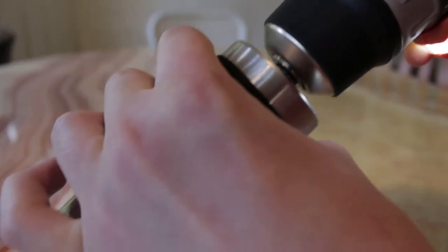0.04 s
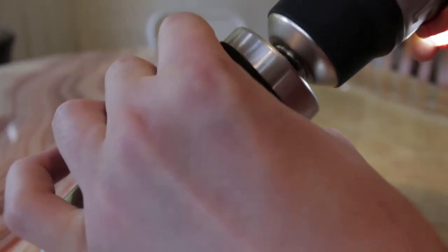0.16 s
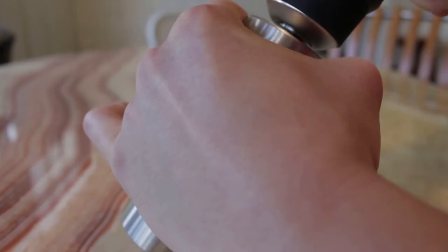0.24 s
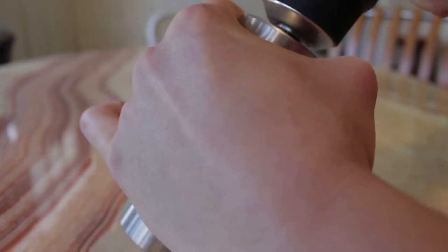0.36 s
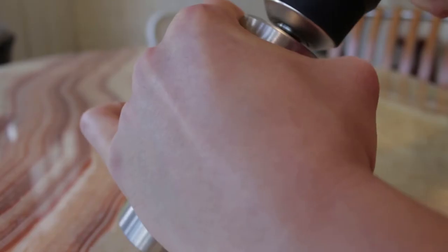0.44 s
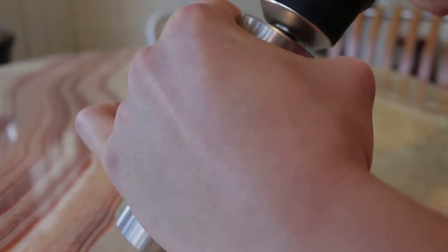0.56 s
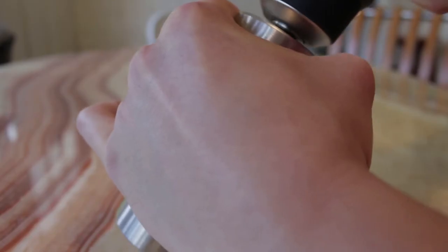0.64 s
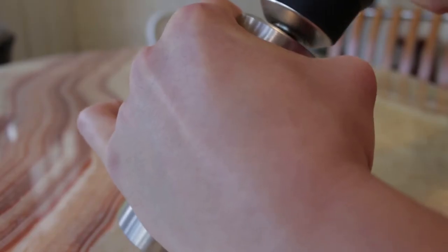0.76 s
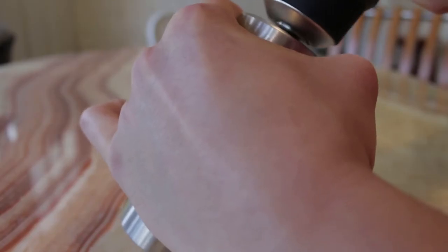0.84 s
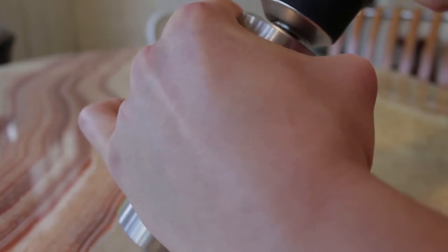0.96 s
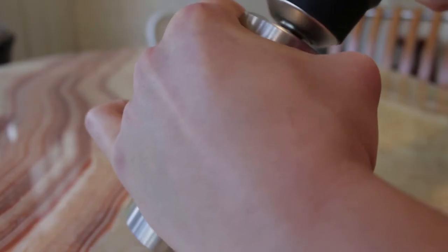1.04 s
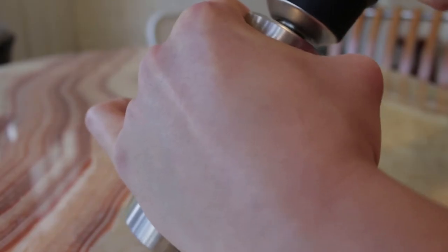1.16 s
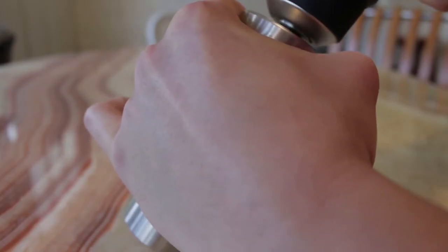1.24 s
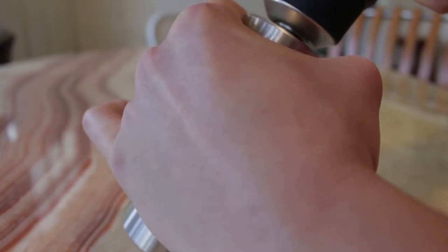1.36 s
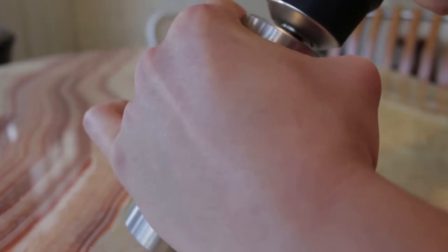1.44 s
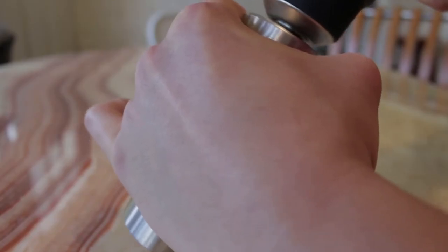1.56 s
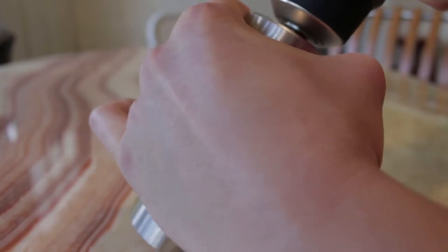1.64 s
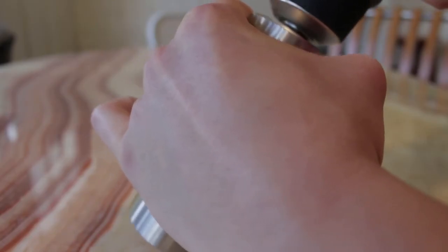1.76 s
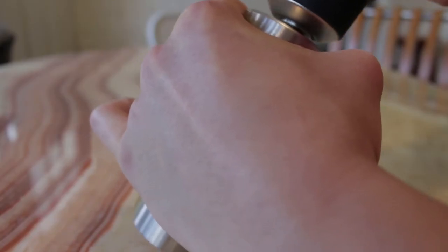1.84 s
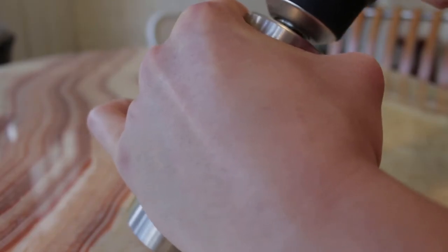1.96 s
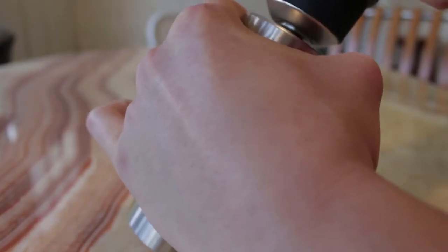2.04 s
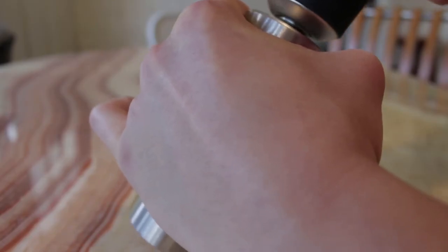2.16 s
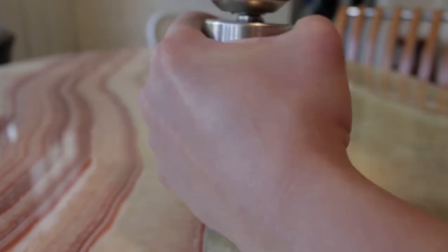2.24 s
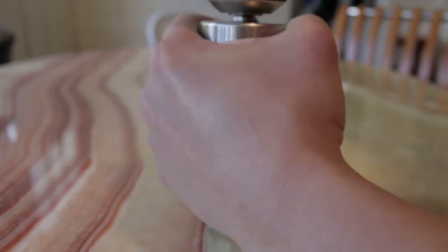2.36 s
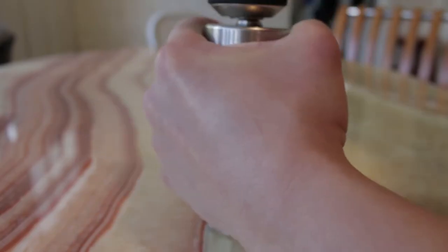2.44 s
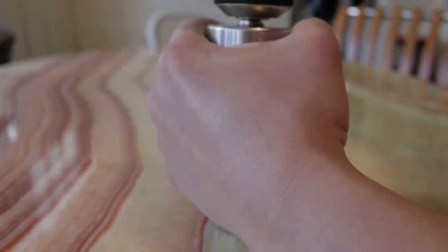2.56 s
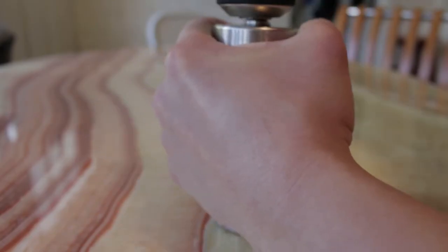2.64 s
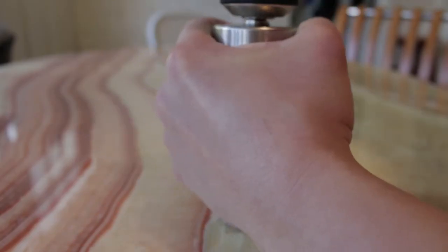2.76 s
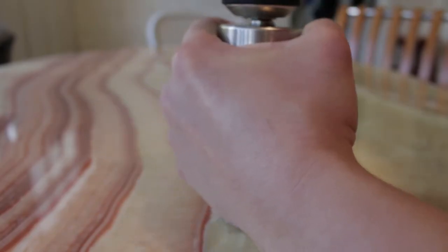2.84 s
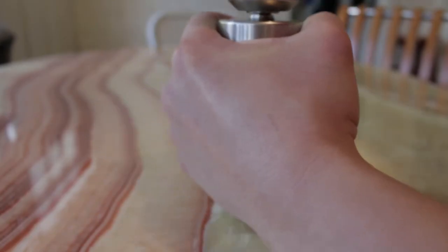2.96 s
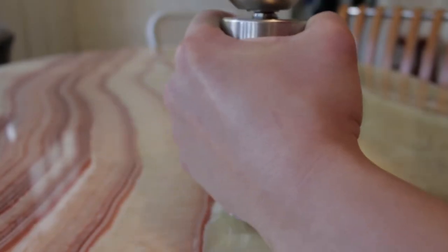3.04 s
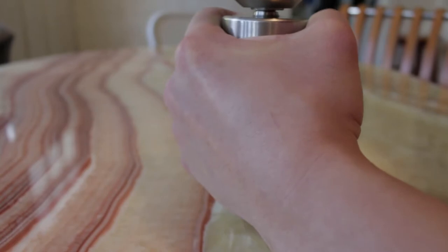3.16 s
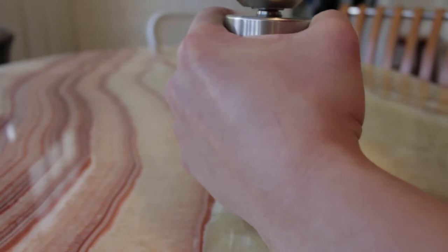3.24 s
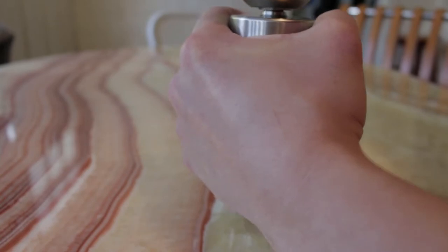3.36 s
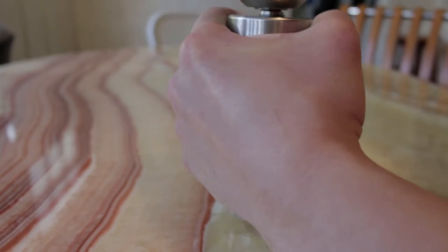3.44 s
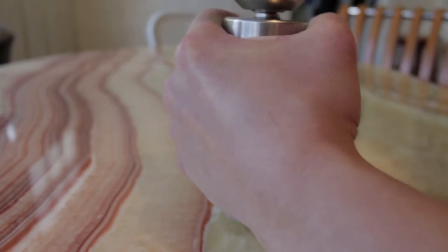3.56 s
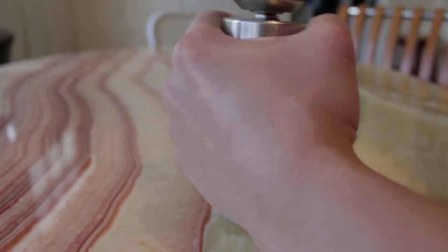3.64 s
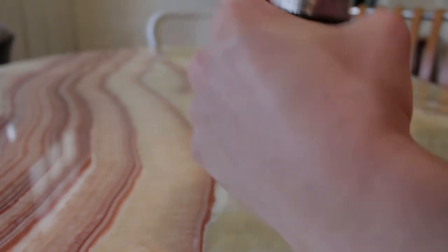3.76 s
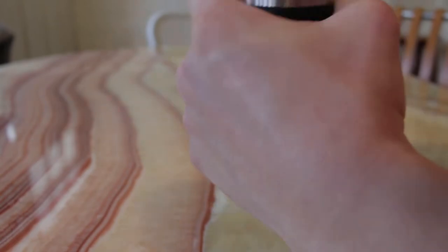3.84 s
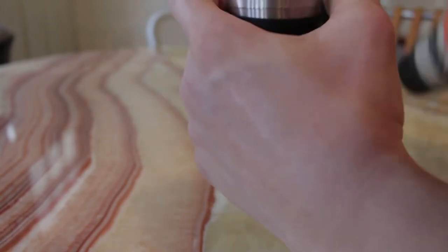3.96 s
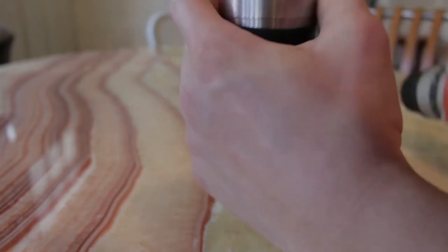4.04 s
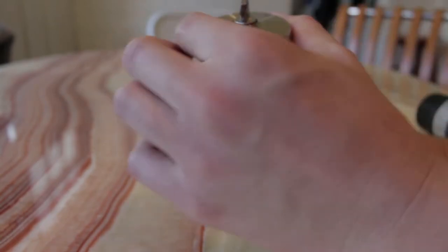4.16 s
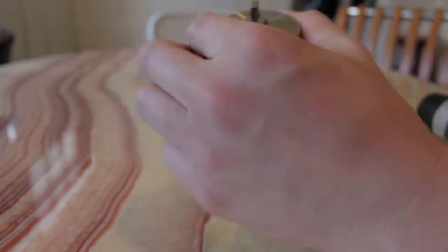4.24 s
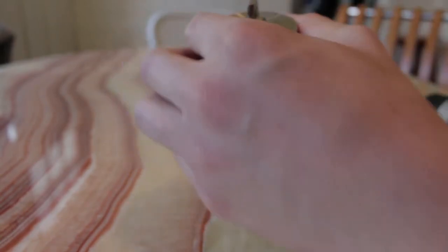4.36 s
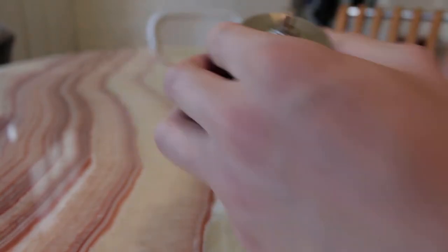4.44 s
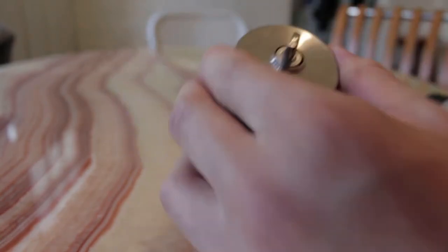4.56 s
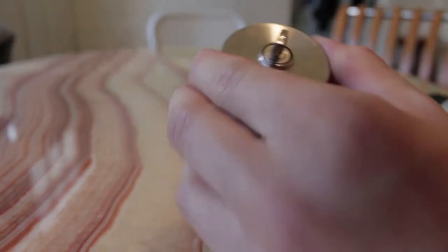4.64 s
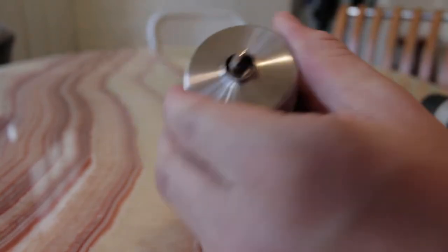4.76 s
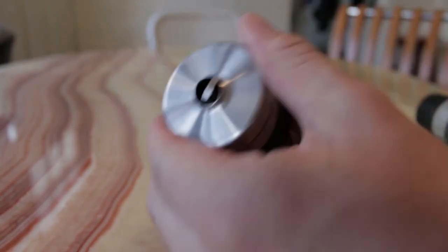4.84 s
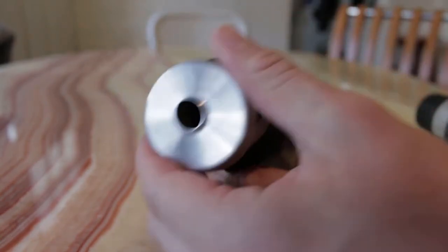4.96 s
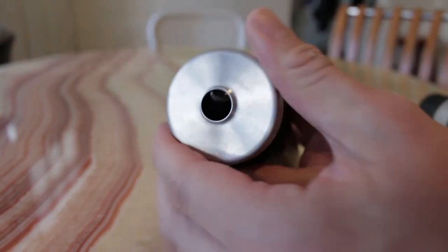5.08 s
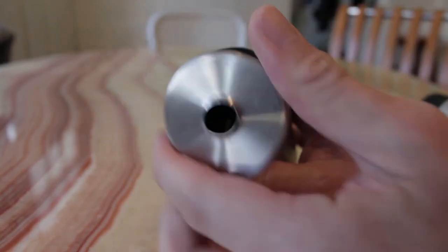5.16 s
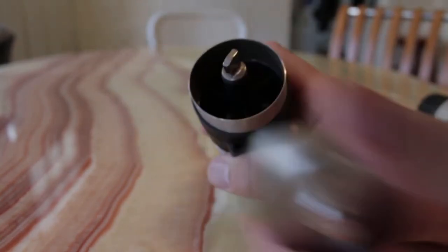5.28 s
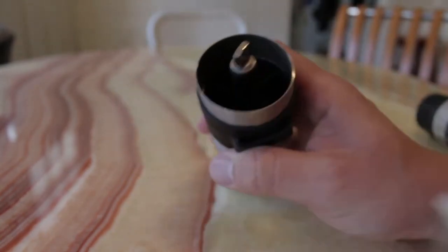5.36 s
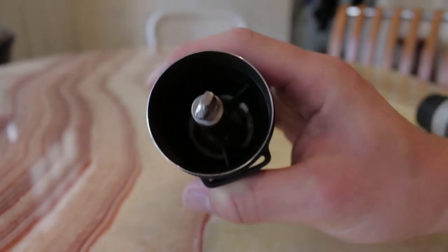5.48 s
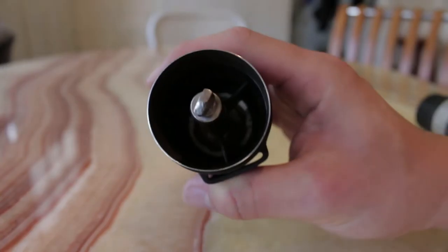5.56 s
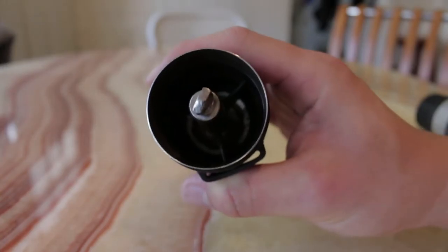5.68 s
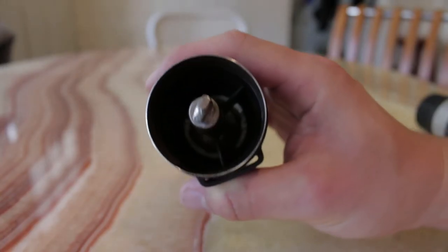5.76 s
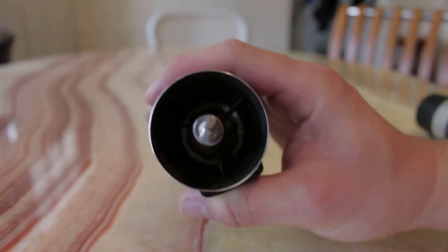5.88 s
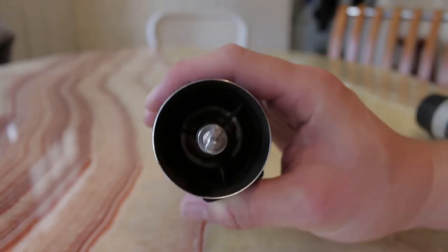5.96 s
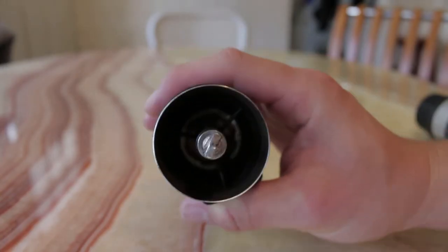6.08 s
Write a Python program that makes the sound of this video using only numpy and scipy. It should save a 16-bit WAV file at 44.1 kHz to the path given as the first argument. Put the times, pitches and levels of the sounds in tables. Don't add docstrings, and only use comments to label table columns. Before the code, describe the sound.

A loud motor whirr with rattling grinder teeth runs slightly right of a near stereo microphone, briefly rising, then jumping by hard cuts into two longer wavering spells. The drill halts, leaving a short steel ring. Fingernail ticks, a heavy table knock, dry scrapes and soft bumps lead to sharp lid clinks, a scraping slide and low air puffs, before the quiet room hush is left alone.

```python
import sys
import numpy as np
from scipy import signal
from scipy.fft import rfft, irfft, next_fast_len
from scipy.io import wavfile
from scipy.ndimage import uniform_filter1d

SR = 44100
rng = np.random.default_rng(int(sys.argv[2]) if len(sys.argv) > 2 else 0)


def file_out(sig):
    cols = np.atleast_2d(sig).T
    lim = np.clip(cols, -1, 1)
    pcm = np.round(lim * 32767).astype(np.int16)
    wavfile.write(sys.argv[1], SR, pcm)


def ratio(d):
    e = np.asarray(d, float) / 20
    return 10 ** e


N = 269444
T = np.arange(N) / SR

SPELL_EDGES = [
    0,
    .229,
    2.229,
    3.671,
]
# [f/Hz, density/dB per Hz]
RATTLE_COLOUR = [
    [(35, -90), (60, -64), (279, -29), (329, 10.5), (378, -33), (466, -17.5), (725, -18), (959, -16),
     (1050, -12.5), (2440, -18), (3450, -13.5), (4570, -27), (15700, -29)],
    [(35, -67), (60, -52), (136, -44), (279, -33), (321, -11), (361, -26.5), (709, -9), (874, -10),
     (1050, -14.5), (2610, -13), (3070, -16.5), (3450, -8.5), (4260, -18), (6180, -16.5), (15700, -26)],
    [(35, -74), (60, -53), (149, -46), (232, -30), (321, -3), (378, -28), (588, -13), (725, -12),
     (874, -11), (1050, -12.5), (2380, -14), (2610, -10.5), (3070, -14.5), (6790, -16), (15700, -24.5)],
]
# [f/Hz, level/dB]
MESH_LINES = [
    [(979.8, -34.5), (3429, -31.5), (4059, -38), (4893, -50), (5259, -44), (9868, -53), (13819, -63),
     (14147, -60)],
    [(969.0, -38), (1292, -57), (1620, -52), (1943, -55), (2568, -54), (2912, -42), (3402, -38.5),
     (3725, -39.5), (4538, -67), (5259, -52), (6153, -44.5), (6912, -43.5), (10686, -46), (11596, -41),
     (14578, -49)],
    [(963.6, -37), (2541, -40), (2885, -42), (3386, -36), (3639, -41.5), (4506, -65.5), (5157, -61.5),
     (5507, -41), (5776, -44), (6121, -51), (6767, -45), (8355, -63), (8753, -60), (10632, -40),
     (11929, -58)],
]
# [rattle level/dB, fan hiss over rattle/dB, extra left minus right/dB]
RATTLE_MIX = [
    (-26.5, 5.5, -2.3),
    (-25.5, -1.5, -1),
    (-25, 0, 0.4),
]
# [t/s, rotor f/Hz, rotor level/dB]
ROTOR_COURSE = [
    [(0, 322.8, -30), (.146, 326.4, -28.5), (.222, 328, -25.5)],
    [(.24, 317, -34.5), (.35, 324.7, -30.5), (1.03, 322.4, -33), (1.12, 317, -46), (1.22, 322.2, -30.5),
     (1.67, 320.3, -34), (2.0, 325.3, -30), (2.09, 322, -35.5), (2.22, 320.6, -31)],
    [(2.24, 315.7, -35), (2.406, 323.2, -32.5), (2.55, 319.6, -37.5), (3.1, 323.2, -32),
     (3.48, 319.4, -36.5), (3.66, 322, -32)],
]
# [t/s, whine f/Hz, whine level/dB]
GEAR_COURSE = [(0, 905, -31), (.225, 915, -51), (.235, 862, -32.5), (.34, 902, -24.5), (.5, 864, -30),
               (.9, 883, -28.5), (1.08, 848.3, -32), (1.28, 885, -27.5), (1.42, 859.5, -27.5),
               (1.55, 879.7, -28), (2.03, 885, -30), (2.45, 890, -25), (2.58, 870, -24.5), (2.74, 899, -26),
               (2.88, 872, -27.5), (3.1, 908, -29.5), (3.47, 860.5, -29.5), (3.58, 883, -24.5)]
# [start t/s, length/s, level/dB]
CHATTER_BURSTS = [
    (2.423, 0.09, -33),
    (2.55, 0.15, -36),
    (2.75, .14, -40.5),
]
# [f/Hz, density/dB per Hz]
HUSH_COLOUR = [(12, -48), (20, -31), (49, -8), (149, -16.5), (186, -10), (268, -10), (364, -4.5),
               (442, -18.5), (537, -9.5), (584, -13), (15700, -44)]
# [f/Hz, left minus right/dB]
STEREO_LEAN = [(60, 0.0), (110, 0.0), (200, 0.0), (380, 0.0), (700, -0.5), (1290, -1.0), (2380, -2.0),
               (4400, -4.5), (8120, -4.5), (15000, -3.5)]
# [start t/s, end t/s, wood level at start/dB, wood level at end/dB, tube level/dB]
SLIDE_STROKES = [
    (3.95, 4.06, -54, -58, -78),
    (4.068, 4.356, -42, -49.5, -47),
    (4.48, 4.628, -56, -41.5, -56.5),
    (4.701, 4.812, -36, -53, -47.5),
    (4.906, 5.153, -43, -48, -44),
    (5.166, 5.229, -46, -42, -74),
    (5.227, 5.43, -42.5, -41.5, -44),
]
# [f/Hz, width/Hz, level/dB]
TUBE_MODES = [(2460, 300, 2.5), (3050, 100, -2.5), (3965, 290, 0.5), (4580, 130, -7), (5060, 430, -9.5)]
# [start t/s, end t/s, f/Hz, level/dB]
FINGER_SQUEAK = (4.075, 4.245, 13800, -56)
# [t/s, level/dB, half length/s]
AIR_PUFFS = [
    (4.077, -56, 0.065),
    (4.203, -54, 0.035),
    (4.656, -54, 0.094),
    (5.199, -38.5, 0.038),
    (5.28, -49, .06),
    (5.377, -47, .04),
    (5.5, -60, 0.13),
    (5.82, -62, 0.18),
]
# [t/s, level/dB]
NAIL_TICKS = [
    (3.832, -46),
    (3.893, -43.5),
    (4.0685, -44),
    (4.684, -32.5),
]
# [t/s, peak level/dB, contact/ms, drag over peak/dB, drag/s]
TABLE_BLOWS = [
    (4.3640, 1.5, 0.31, -29, 0.07),
    (4.6227, -26, 0.35, 0.5, 0.052),
    (4.8194, -25.5, 0.67, -13, 0.016),
    (4.864, -27, 2.7, -22, 0.027),
    (4.876, -29.5, 2.2, -23, 0.033),
    (5.2205, -32, .4, -5.5, 0.0085),
]
# [f/Hz, level/dB, t60/s]
TABLE_MODES = [(281, 5.5, 0.23), (442, 14.5, 0.01), (600, 1, 0.07), (670, 4, 0.032), (857, 12, 0.032),
               (1060, -6, 0.014), (1434, 2.5, .04), (1730, 3.5, 0.044), (2070, -5, 0.017),
               (2700, -19, 0.026), (4000, -18, .01)]
# [f/Hz, density/dB per Hz]
DRAG_COLOUR = [(290, -19), (500, -17), (628, -23), (976, -7.5), (1280, -6), (1850, -14), (2200, -23),
               (2840, -18), (3230, -27.5), (7470, -34), (15000, -49)]
# [t/s, peak level/dB, brightness/dB, lifted 0-1]
LID_CLINKS = [(4.781, -29, -4, 0.1), (4.8175, -18, 1, 0), (4.8193, -6.5, -4, 0.1),
              (4.8217, -11.5, 10, 0.07), (4.859, -35, 7, 0.1), (4.866, -30, 5, 0.1), (4.879, -34, 3, 0.2),
              (4.8868, -21, 5, 0.8), (4.8885, -13, 4, 0.9), (4.893, -17.5, 8, 0.93), (4.905, -28, 6, 1),
              (4.924, -39, 4, 1)]
# [f/Hz, level/dB, t60/s]
LID_MODES = [(444, -11.5, 0.035), (1720, -14, 0.028), (3040, -15, 0.11), (3110, 3.5, 0.013),
             (3270, -4.5, 0.039), (3450, -3, 0.0097), (4900, -16, 0.11), (5130, -8.5, 0.02),
             (7870, -32, 0.17), (7720, -13.5, 0.013), (10200, -28.5, 0.066), (11600, -23, 0.018),
             (13800, -29, 0.027)]
FLAT = [(1, 0), (2, 0)]

LAST_CHANGE_S = 5.430
STOP_S = 0.0053
CHUCK_HZ = 9.2
SWAY_RATE_HZ, SWAY_PITCH, SWAY_DB = 14, 0.00799, -0.64
CHATTER_REST_DB, CHATTER_EDGE_DB_PER_S = -61.5, 600
BASS_T60_S, TREBLE_T60_S, LEFT_LAG_S = 0.47, 0.55, .00004
RING_OUT_DB, RING_OUT_T60_S = -45, .33
TUBE_FOLLOWS, SKIN_DB = 0.65, -6
SQUEAK_RATE_HZ, SQUEAK_SWING_HZ, SQUEAK_SWING_DB = 10.4, 230, 4
LIFT_DROP, RIM_HZ = 0.083, 4000


def unit(x):
    return x / np.sqrt(np.mean(x ** 2))


def shape(x, points, lo_hz=0, hi_hz=1e6):
    length = x.shape[-1]
    size = next_fast_len(length, True)
    f = np.arange(size // 2 + 1) * SR / size + 1e-3
    hz, db = np.transpose(points)
    curve = ratio(np.interp(np.log(f), np.log(np.maximum(hz, 1)), db))
    edges = 1 / np.sqrt((1 + (lo_hz / f) ** 8) * (1 + (f / hi_hz) ** 8))
    return irfft(rfft(x, size) * curve * edges, size)[..., :length]


def band(lo_hz, hi_hz, x=None):
    source = rng.standard_normal(N) if x is None else x
    return unit(shape(source, FLAT, lo_hz, hi_hz))


def walk(rate_hz, size=N):
    k = int(SR / rate_hz)
    return unit(uniform_filter1d(uniform_filter1d(rng.standard_normal(size), k), k))


def columns(rows):
    s, *rest = np.transpose(rows)
    return [np.interp(T, s, column) for column in rest]


def tone(hz):
    return np.sqrt(2) * np.sin(2 * np.pi * (np.cumsum(hz) / SR + rng.random()))


def grit(rate_hz, spread_db):
    hits = rng.random(N) < rate_hz / SR
    force = rng.standard_normal(N)
    return hits * force * ratio(spread_db * np.minimum(rng.exponential(size=N), 3))


def ring(modes, gains_db, rise_s=1e-5):
    t = T[:SR // 2]
    sound = np.zeros(len(t))
    for (hz, db, t60), gain_db in zip(modes, gains_db):
        sound += ratio(db + gain_db) * np.sin(2 * np.pi * hz * t) * 1000. ** (-t / t60)
    return sound * (1 - np.exp(-t / rise_s))


def add(track, s, sound, db):
    i = int(s * SR)
    track[i:i + len(sound)] += ratio(db) * sound / np.abs(sound).max()


def space(x, room_db):
    t = T[:int(.6 * SR)]
    noise = rng.standard_normal((2, len(t))) * (t > .003)
    bass = shape(noise, FLAT, hi_hz=2200)
    treble = noise - bass
    mid, side = bass * 1000. ** (-t / BASS_T60_S) + treble * 1000. ** (-t / TREBLE_T60_S)
    side = shape(side, [(250, -15.5), (1000, -5.0), (4000, 0.5), (12000, -7.0)])
    tails = np.array([mid + side, mid - side]) / np.sqrt(2 * np.sum(mid ** 2))
    left = np.interp(T[:len(x)] - LEFT_LAG_S, T[:len(x)], x)
    room = signal.fftconvolve(x[None], tails, axes=1)[:, :len(x)]
    both = np.array([left, x]) + ratio(room_db) * room
    both /= np.sqrt(1 + ratio(2 * room_db))
    leans = [[(hz, sign * db / 2) for hz, db in STEREO_LEAN] for sign in (1, -1)]
    return np.array([shape(port, lean) for port, lean in zip(both, leans)])


def tooth_rattle(span, chuck, colour, rattle_db, fan_db):
    n = len(chuck)
    teeth = unit(grit(3000, 1.25)[span]) + 1.18 * rng.standard_normal(n)
    teeth = shape(teeth * ratio(0.18 * chuck + 0.98 * np.tanh(walk(25, n))), colour)
    teeth /= np.std(shape(teeth, FLAT, 1260, 3890))
    body_eq = [(200, -1.0), (270, -9), (323, -9.5), (400, 2.0), (750, -6.5), (870, 4), (1050, 1.5)]
    low = shape(teeth, body_eq, hi_hz=3850)
    fan = shape(teeth, FLAT, lo_hz=4540)
    return ratio(rattle_db - 1) * (low + ratio(fan_db) * fan)


def gear_whine(chuck, whine_hz, whine_db):
    n = len(chuck)
    pitch = whine_hz * (1 + 0.0107 * walk(73.3, n) + 0.011 * chuck)
    whine = ratio(whine_db + 1.1 * chuck + 5.2 * np.tanh(walk(52, n)) - 1) * tone(pitch)
    third_db = whine_db - 6.5 + 3.0 * chuck + 3.5 * np.tanh(walk(84, n))
    third = ratio(third_db) * tone(3 * pitch)
    return whine, shape(third, [(2300, -14), (2520, 8.0), (2680, -3.5), (2850, -14)])


def mesh_tones(rotor_hz, lead, mesh):
    n = len(rotor_hz)
    speed = uniform_filter1d(rotor_hz, size=SR // 4) / np.mean(rotor_hz[lead:])
    lines = np.zeros(n)
    for hz, db in mesh:
        level = ratio(db + 1.0 + 1.3 * walk(25, n))
        lines += level * tone(hz * speed * (1 + 0.001926 * walk(52.4, n)))
    return lines


def rotor_hum(rotor_hz, rotor_db):
    n = len(rotor_hz)
    rotor_hz = rotor_hz * (1 + 0.00303 * walk(11.9, n))
    second = ratio(-19.5 + 2.7 * walk(14, n)) * tone(2 * rotor_hz)
    fourth = ratio(-16.5 + 3 * walk(15, n)) * tone(4 * rotor_hz)
    return ratio(rotor_db + 0.87 * walk(27, n)) * (tone(rotor_hz) + second + fourth)


def base_chatter(span, n):
    inside = []
    for start, length, db in CHATTER_BURSTS:
        outside_s = np.minimum(np.minimum(T[span] - start, start + length - T[span]), 0)
        inside.append(outside_s * CHATTER_EDGE_DB_PER_S + db)
    buzz_db = np.maximum(np.max(inside, axis=0), CHATTER_REST_DB)
    buzz = tone(272 * (1 + 0.0288 * walk(78, n)))
    buzz = buzz + 0.11 * band(120, 350.0)[span] + 0.66 * band(480, 658)[span]
    return ratio(buzz_db - 1.5 + 6.5 * np.tanh(walk(52, n))) * buzz


def drill(start, end, rotor_rows, mix, colour, mesh):
    first, last = int(start * SR), int(end * SR)
    lead = min(first, SR // 4)
    span, n = slice(first - lead, last), last - first + lead
    rattle_db, fan_db, lean_db = mix
    rotor_hz, rotor_db = (curve[span] for curve in columns(rotor_rows))
    whine_hz, whine_db = (curve[span] for curve in columns(GEAR_COURSE))
    load = 1.403 * np.tanh(walk(SWAY_RATE_HZ, n))
    whine_hz = whine_hz * (1 - SWAY_PITCH * load)
    chuck = tone(CHUCK_HZ * (1 + 0.0592 * walk(3.9, n)))
    rattle = tooth_rattle(span, chuck, colour, rattle_db + SWAY_DB * load, fan_db - SWAY_DB * load)
    whine, third = gear_whine(chuck, whine_hz, whine_db)
    lines = mesh_tones(rotor_hz, lead, mesh)
    low_end = rotor_hum(rotor_hz, rotor_db) + base_chatter(span, n)
    airborne = space(rattle + third, room_db=-2) + space(whine + lines, room_db=-10.0)
    out = np.zeros((2, N))
    out[:, first:last] = airborne[:, lead:]
    out *= ratio(lean_db / 2 * np.array([[1], [-1]]))
    out[:, first:last] += low_end[lead:]
    return out


def hush():
    mid, side = shape(rng.standard_normal((2, N)), HUSH_COLOUR)
    side = shape(side, [(60, -25.5), (500, -11.5), (2000, -3.5), (8000, 2)])
    return ratio(-51 + .5 * walk(6)) * np.array([mid + side, mid - side]) / np.std(mid)


def change_thumps():
    width_s = .0007
    return ratio(-25) * sum(np.exp(-((T - s) / width_s) ** 2) for s in SPELL_EDGES[1:-1])


def finger_squeak():
    start, end, hz, db = FINGER_SQUEAK
    swing = -np.cos(2 * np.pi * SQUEAK_RATE_HZ * (T - start + .013))
    pitch = (hz + SQUEAK_SWING_HZ * swing) * (1 + 0.001 * walk(80))
    return ((T > start) & (T < end)) * ratio(db + SQUEAK_SWING_DB * swing) * tone(pitch)


def slides():
    rough = unit(grit(2500, 0.77)) + 0.98 * rng.standard_normal(N)
    f = np.geomspace(1500, 7000, num=60)
    tube_power = sum(ratio(2 * db) / (1 + (2 * (f - hz) / width) ** 2) for hz, width, db in TUBE_MODES)
    tube = np.transpose([f, 10 * np.log10(tube_power)])
    wood = unit(shape(rough, [(200, -4), (275, 13.5), (350, 5.5), (1800, 3)], 200, 1460))
    steel = band(1900, 6200, shape(rough, tube) + .07 * rough)
    skin = 1.4 * band(9000, 17000, rough)
    out = ratio(RING_OUT_DB - 60 * np.abs(T - SPELL_EDGES[-1]) / RING_OUT_T60_S) * steel
    slip_db = 1.9 * walk(28)
    for start, end, from_wood_db, to_wood_db, tube_db in SLIDE_STROKES:
        fade_db = np.interp(T, [start, end], [0, to_wood_db - from_wood_db])
        metal = ratio(tube_db + TUBE_FOLLOWS * fade_db) * (steel + ratio(SKIN_DB) * skin)
        stroke = ratio(from_wood_db + fade_db + slip_db) * wood + metal
        out += ((T > start) & (T < end)) * stroke
    return out + finger_squeak()


def air():
    swell = ratio(-61) + sum(ratio(db) * np.exp(-((T - s) / half_s) ** 2) for s, db, half_s in AIR_PUFFS)
    rumble = band(57, 230) + 0.97 * band(26, 56)
    return (T > SPELL_EDGES[-1]) * swell * ratio(1.8 * walk(25)) * rumble


def knocks():
    out = np.zeros(N)
    drag = unit(shape(unit(grit(4000, 2.1)) + rng.standard_normal(N), DRAG_COLOUR))
    tick = band(2500, 13000)
    for s, db in NAIL_TICKS:
        out += (T > s) * ratio(db) * np.exp(-np.maximum(T - s, 0) / 0.0023) * tick
    scatters = rng.standard_normal((len(TABLE_BLOWS), len(TABLE_MODES)))
    for (s, db, ms, drag_db, drag_s), scatter in zip(TABLE_BLOWS, scatters):
        push = np.exp(-(np.arange(-60, 61) / (ms * SR / 2000)) ** 2)
        sound = -np.gradient(np.convolve(push, ring(TABLE_MODES, 2 * scatter)))[40:]
        add(out, s, sound, db)
        after = np.maximum(T - s, 0)
        out += (T > s) * ratio(db + drag_db) * np.exp(-after / drag_s) * drag
        out += (T > s) * ratio(db + drag_db - 6.5) * np.exp(-after / 0.0043) * tick
    return out


def clinks():
    out = np.zeros(N)
    hz, gain_db, t60 = np.transpose(LID_MODES)
    scatters = rng.standard_normal((len(LID_CLINKS), len(LID_MODES)))
    for (s, db, bright_db, lifted), scatter in zip(LID_CLINKS, scatters):
        pitch = hz * (1 + 0.0038 * scatter[0]) * (1 - LIFT_DROP * lifted * (hz > RIM_HZ))
        tilt_db = bright_db * np.abs(np.log2(hz / 3000)) * np.where(hz > 2500, 1, -.6)
        sound = ring(zip(pitch, gain_db, t60), tilt_db + 2.0 * scatter, rise_s=0.0003)
        add(out, s - .0004, sound, db)
    return out * ratio(1.9 * np.tanh(walk(150)))


def scene():
    spells = zip(SPELL_EDGES, SPELL_EDGES[1:], ROTOR_COURSE, RATTLE_MIX, RATTLE_COLOUR, MESH_LINES)
    out = sum(drill(*spell) for spell in spells)
    out = out * np.clip((SPELL_EDGES[-1] - T) / STOP_S, 0, 1) + hush()
    span = slice(int(SPELL_EDGES[-1] * SR), int(LAST_CHANGE_S * SR))
    out[:, span] += space((slides() + knocks())[span], room_db=-2.5)
    out[:, span] += space(clinks()[span], room_db=-7.5)
    return out + air() + change_thumps()


def roll_off(x):
    return signal.sosfilt(signal.butter(12, 16120, fs=SR, output="sos"), x)


def record(dry):
    top = signal.ellip(10, .1, 70, 15900, fs=SR, output="sos")
    return roll_off(signal.sosfiltfilt(top, dry))


dry = scene()
out = record(dry)
file_out(out)
```